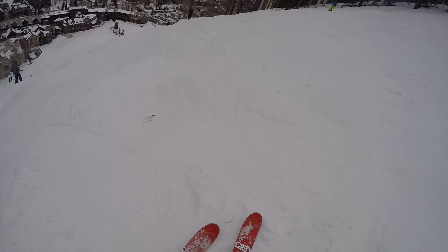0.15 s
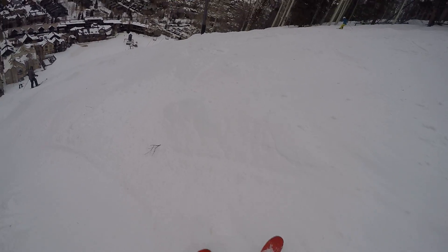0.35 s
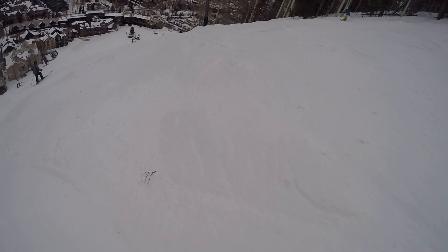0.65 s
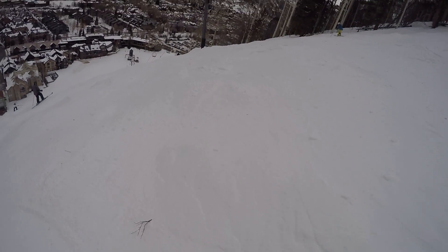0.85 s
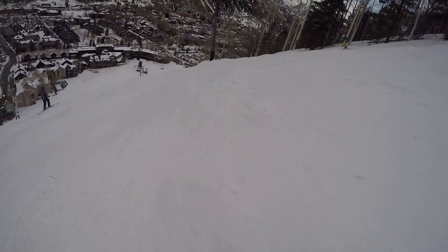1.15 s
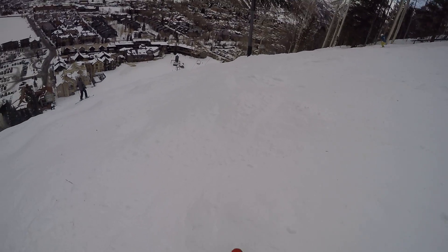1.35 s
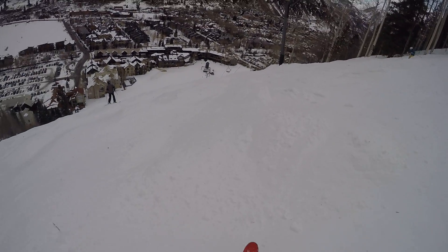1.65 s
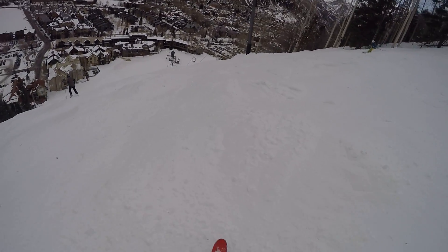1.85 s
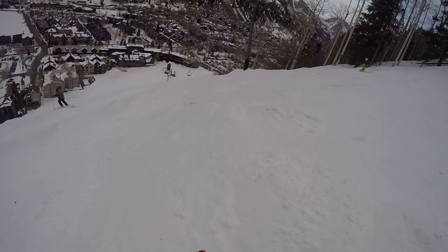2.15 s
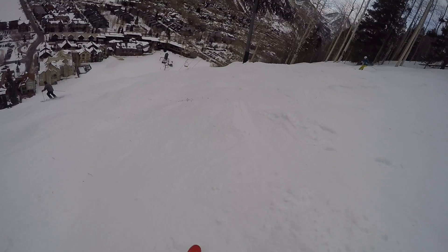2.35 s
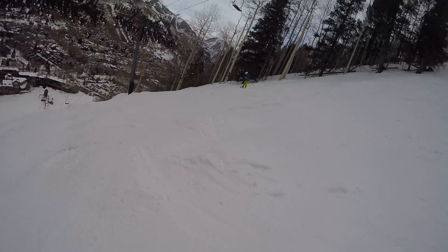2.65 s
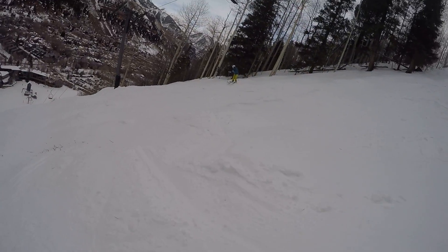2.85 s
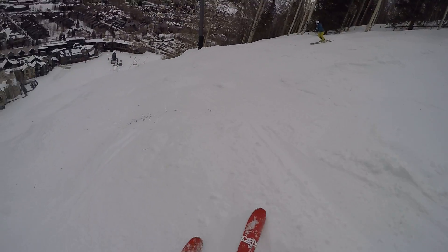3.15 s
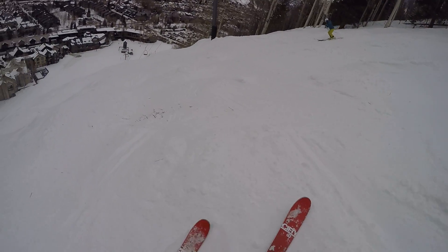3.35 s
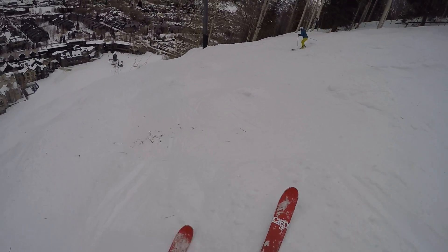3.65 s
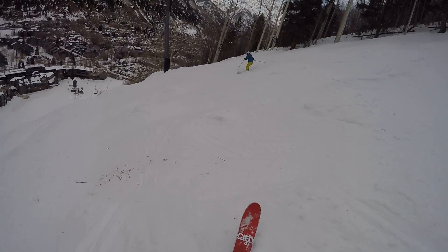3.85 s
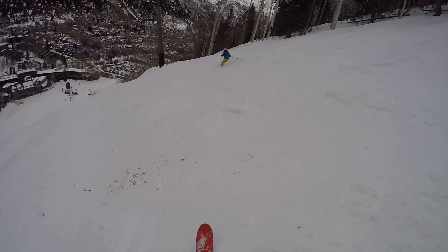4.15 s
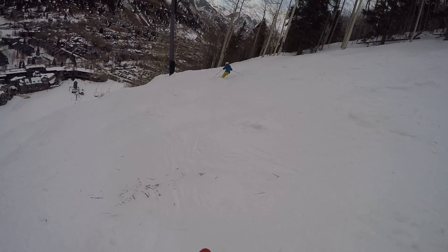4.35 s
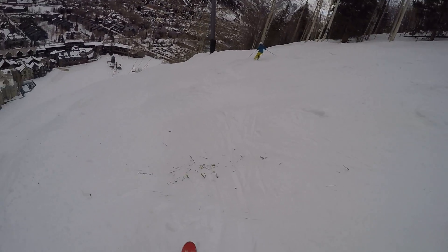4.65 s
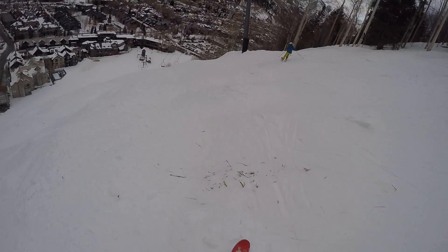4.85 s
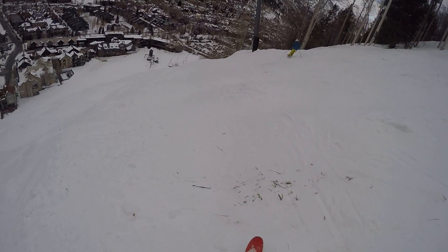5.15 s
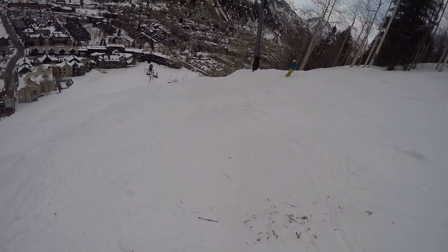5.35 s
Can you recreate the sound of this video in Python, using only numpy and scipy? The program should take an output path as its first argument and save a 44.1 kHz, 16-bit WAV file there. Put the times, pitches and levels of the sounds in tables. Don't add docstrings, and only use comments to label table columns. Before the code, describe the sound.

On an open packed slope, a body-worn camera in a closed housing catches deep, fluttering wind rumble over a fainter, grainy scrape of skis. The edge hiss swells and thins with the turns. A bump knocks early, wind bursts hardest around three seconds, and the sharpest knock comes just after four.

```python
import sys
import numpy as np
from scipy import signal
from scipy.fft import rfft, irfft, next_fast_len
from scipy.io import wavfile
from scipy.ndimage import uniform_filter1d, map_coordinates

SR = 44100
rng = np.random.default_rng(int(sys.argv[2]) if len(sys.argv) > 2 else 0)


def digitize_waveform(pressure):
    field = np.atleast_2d(pressure).T
    bounded = np.clip(field, -1, 1)
    quanta = np.round(bounded * 32767).astype(np.int16)
    wavfile.write(sys.argv[1], SR, quanta)


def voltage_ratio(level):
    return 10 ** (np.asarray(level, float) / 20)


N = 242550

# peak time in seconds, peak level in dB, build-up in seconds, beat in Hz.
GUSTS = [(0.129, -23.5, 0.061, 30.34), (0.246, -19, 0.086, 29.52), (.40, -24, 0.072, 32.45),
         (.484, -24.5, 0.056, 31.7), (0.586, -30, 0.098, 36.8), (1.073, -30.5, 0.11, 43.06),
         (1.331, -24, 0.0942, 33.8), (1.506, -23.5, 0.13, 38.1), (1.62, -29, 0.047, 41.1),
         (1.83, -22.5, 0.18, 41.12), (1.93, -23, 0.058, 33.7), (2.014, -24, 0.083, 35),
         (2.127, -22, 0.054, 37.06), (2.236, -25, 0.066, 41.87), (2.369, -23, 0.052, 35),
         (2.674, -16, 0.099, 37.99), (2.794, -22.5, 0.12, 36.96), (2.978, -12.5, 0.049, 36.95),
         (3.057, -9, 0.044, 35), (3.241, -15, 0.088, 36.35), (3.41, -25.5, .1, 41.2),
         (3.87, -25.5, 0.062, 38.48), (4.01, -24, 0.16, 39.18), (4.17, -22, 0.16, 32.75),
         (4.276, -16, 0.064, 33), (4.402, -22, 0.14, 36.33), (4.729, -20, 0.0685, 33.74),
         (4.85, -24.5, 0.062, 32.05), (5.034, -21, 0.086, 33.4), (5.39, -28, 0.086, 33.2)]
# time in seconds, level in dB.
STREAM = [(0, -31.5), (.3, -38), (.75, -37.5), (.95, -34.5), (2.2, -35), (2.43, -39), (2.6, -29),
          (3.45, -29), (3.66, -24.5), (3.8, -34.5), (4.58, -27), (4.95, -32), (5.13, -26.5), (5.28, -37),
          (5.5, -32.5)]
BEAT_UNREST = (-28, -12), (.85, .3)
# time in seconds, strength in dB, share of small eddies in dB.
EDDIES = [(0.0, -38, -0.5), (0.5, -52, 0), (.75, -52, 4.5), (0.96, -44, 1.5), (1.33, -44.5, 1.5),
          (1.54, -47, -3), (1.65, -38, -4.5), (1.78, -35.5, -0.5), (2.2, -47, 1), (2.55, -44.5, -1.5),
          (2.65, -36, -2), (2.76, -42.5, 1), (3.02, -39.5, -1), (3.47, -45, 2.5), (3.62, -49.5, 2),
          (4.4, -44, 1.5), (4.82, -50.5, -1), (5.5, -41, 1.5)]
# frequency in Hz, density in dB per Hz.
RUMBLE_SPECTRUM = [(14, -14), (24, -2), (34, 0), (48, -3), (62, -5), (80, -14), (110, -40)]
SWIRL_SPECTRUM = [(40, -59), (60, -10.5), (80, -7), (140, -6.5), (190, -17), (260, -49.5)]
FLUTTER_SPECTRUM = [(120, -7), (180, 2.5), (250, -2.5), (350, -7.5), (420, -11.5), (600, -25), (1000, -33)]
RUSH_SPECTRUM = [(300, 0.5), (420, -23), (560, 2), (820, -2.5), (950, 1.5), (1050, -87)]
# time in seconds, edge pressure in dB, powder thrown in dB.
TURNS = [(0.0, -53.5, 1), (.33, -48.5, 1), (.48, -57, 1.5), (.9, -60.5, -1), (1.08, -58.5, 4),
         (1.3, -50.5, -0.5), (1.75, -49.5, -1.5), (2.08, -52.5, 3.5), (2.27, -60, 4), (2.565, -54.5, 0.5),
         (2.6, -50, 0.5), (3.0, -47, 0.5), (3.45, -49.5, 2.5), (3.8, -51.5, 3), (4.4, -46, -0.5),
         (5.0, -50, 1), (5.15, -51.5, 1), (5.5, -53, -1)]
# time in seconds, change in dB,
# half length in seconds, share that reaches the fine crystals [1].
BITES = [(0.036, 6, 0.011, 0.9), (0.64, 4.5, 0.028, 0), (0.86, 9, 0.077, 0.2), (1.126, 8, 0.0067, 0),
         (1.43, 3, 0.045, 0.9), (1.59, -8.5, 0.068, 0.2), (1.254, 0, 0.024, 0.2), (1.936, -4.5, 0.032, 1.3),
         (2.048, 2, 0.019, 0.5), (2.342, 5, 0.035, 0.33), (2.769, 2, 0.031, 0), (2.87, 3, 0.035, 1),
         (3.02, 3, 0.079, 0.59), (3.13, -2, 0.053, 1), (3.297, -4, 0.084, 1), (3.462, 3.5, 0.048, 1),
         (3.607, 4.5, 0.011, 0.7), (3.758, -5.5, 0.026, 0.08), (3.891, 5, 0.027, 0.71),
         (4.004, 4, 0.018, 1.1), (4.244, -3, 0.039, 1.28), (4.402, 5, 0.039, 0.99), (4.563, -2.5, 0.15, .6),
         (4.993, 3, 0.048, 1.3), (5.101, -1.5, .03, 0.38), (5.222, 0.5, .03, 0.7), (5.365, -5, .04, 0),
         (5.47, -1, 0.029, 0.01)]
# frequency in Hz, density in dB per Hz.
SNOW_SPECTRUM = [(500, -62), (800, -12), (980, -20), (1100, -4), (2000, 1.5), (4300, -10), (5100, -20),
                 (7000, -24.5), (9500, -25.5), (12500, -34), (15300, -40)]
# centre in Hz, width in Hz, rise in dB.
HOUSING = [(1056, 140, 3.5), (1836, 84, 6), (2560, 240, 2), (2930, 200, 3), (3930, 520, 8.5),
           (4710, 140, 3), (5160, 170, -5.5), (5940, 1060, 14.5), (7600, 220, 3), (10200, 290, 2),
           (14000, 1500, 6.5)]
# peak time in seconds, level in dB, ring in Hz, width in Hz,
# length in seconds.
SNAPS = [(.026, -41.5, 1140, 89, 0.028), (.027, -43, 2400, 150, .008), (0.032, -38.5, 2430, 109, 0.0062),
         (0.026, -45.5, 5870, 400, 0.016), (1.148, -46.5, 1230, 120, 0.0054),
         (2.581, -43.5, 1820, 401, 0.018), (2.582, -43, 3850, 400, 0.011), (2.835, -42, 2420, 500, 0.023),
         (3.01, -41.5, 1244, 298.5, .008), (3.4, -46, 2590, 120, 0.17), (3.877, -47, 3916, 300, 0.062),
         (4.003, -42.5, 3900, 300, 0.022)]
# peak time in seconds, level in dB, ring in Hz, width in Hz,
# length in seconds.
SHAVINGS = [(0.423, -56, 815, 101, 0.016), (0.833, -58.5, 806, 150, 0.12), (1.392, -56.5, 4750, 120, .06),
            (1.406, -50, 4050, 201, 0.073), (1.77, -51, 1790, 150, 0.09), (1.782, -66, 7600, 250, .11),
            (1.8, -50.5, 3770, 198.7, .09), (2.707, -52, 2930, 150, .035), (2.873, -62, 10500, 400, 0.056),
            (3.192, -45, 3020, 246.7, 0.032), (3.446, -49, 4077, 250, 0.029),
            (3.93, -64, 10150, 401, 0.037), (4.388, -57, 10400, 3000, .03), (4.405, -44, 3030, 900, .03),
            (4.498, -54.5, 810, 150, 0.036), (5.463, -55.5, 710, 199.9, 0.046)]
# time in seconds, peak level in dB, pitch in Hz.
PUFFS = [(0.074, -25, 157), (0.097, -26, 123), (0.212, -34, 243), (0.234, -29, 150), (0.513, -41, 208),
         (.67, -38, 197), (.85, -29, 110), (0.873, -38, 205), (1.122, -40, 118), (1.312, -29.5, 105),
         (1.736, -42, 336), (1.772, -43, 119), (1.8, -36, 288), (2.35, -34.5, 223), (2.367, -21.5, 128),
         (2.612, -17, 83), (2.646, -20, 96), (2.68, -24, 80.8), (2.71, -34, 182), (2.756, -35.5, 242),
         (2.8, -29, 109.2), (3.208, -38, 163), (3.329, -31, 131.6), (3.442, -28.5, 116.6), (3.47, -33, 137),
         (3.579, -39, 119), (3.902, -33.5, 136), (5.019, -46, 222), (5.433, -39.5, 381.3),
         (5.482, -39.5, 394)]
# time in seconds, peak level in dB, tilt to upper modes in dB per octave.
KNOCKS = [
    (0.1726, -15, -7.5),
    (0.389, -35, -9.5),
    (1.587, -43, 1),
    (2.609, -21, -10),
    (3.019, -39, 1),
    (4.085, -12.5, -2),
    (5.229, -33.5, -29),
]
# frequency in Hz, level in dB, 60 dB decay time in seconds.
MOUNT = [(150, 5, 0.025), (329.6, 0.5, 0.046), (570, -10.5, 0.053), (873, -15.5, 0.027), (1034, -23, .03)]
# start in seconds, length in seconds, peak level in dB,
# first pitch in Hz, last pitch in Hz.
HUMS = [
    (0.524, .16, -38.5, 159.4, 125.5),
    (1.654, 0.095, -41.5, 135, 206.5),
    (1.806, .11, -37.5, 245, 127.5),
    (2.314, .045, -28, 113.1, 135.2),
]

MEAN_PRESSURE_DB = -51


def unit(x):
    return x / np.sqrt(np.mean(x ** 2) + 1e-20)


def along(points, hz):
    f, v = np.transpose(points)
    return np.interp(np.log(hz + 1), np.log(f + 1), v)


def curves(rows):
    s, *cols = np.transpose(rows)
    return [np.interp(np.arange(N) / SR, s, c) for c in cols]


def wobble(rate):
    knots = rng.standard_normal(int(N * 60 / SR))
    return map_coordinates(knots, [np.arange(N) * rate / SR])


def coloured(x, gain_db):
    m = next_fast_len(N + SR // 4)
    gain = voltage_ratio(gain_db(np.fft.rfftfreq(m, 1 / SR)))
    return unit(irfft(rfft(x, m) * gain, m)[:N])


def lumpy(spectrum, depth_db, rate):
    noise = rng.standard_normal(N) * voltage_ratio(depth_db * wobble(rate))
    return coloured(noise, lambda hz: along(spectrum, hz) - 100 * (hz > 2 * spectrum[-1][0]))


def tone(hz):
    return np.sqrt(2) * np.sin(2 * np.pi * np.cumsum(hz) / SR)


def gusts():
    t = np.arange(N) / SR
    drop_db, fall = 11, 0.715
    steady_hz = 35
    power = []
    for s, db, rise, _ in GUSTS:
        away = np.maximum((s - t) / rise, (t - s) / (fall * rise))
        power.append(voltage_ratio(db - drop_db * away ** 1.2) ** 2)
    power = np.array(power)
    steady = voltage_ratio(curves(STREAM)[0]) ** 2
    total = power.sum(0) + steady
    beat_hz = (np.array(GUSTS)[:, 3] @ power + steady_hz * steady) / total
    return beat_hz, 10 * np.log10(total)


def edges():
    t = np.arange(N) / SR
    pressure_db, powder_db = curves(TURNS)
    bumps = np.array([db * np.exp(-((t - s) / half) ** 2) for s, db, half, _ in BITES])
    around_db = pressure_db - MEAN_PRESSURE_DB
    coarse_db = around_db + bumps.sum(0)
    fine_db = around_db + np.array(BITES)[:, 3] @ bumps
    return coarse_db, fine_db, powder_db


def vortex(beat_hz, buffet_db):
    loose = np.interp(buffet_db, *BEAT_UNREST)
    beat = tone(beat_hz * (1 + .08 * wobble(16))) * (1 + .55 * loose * wobble(26))
    beat = unit(beat + loose * lumpy(RUMBLE_SPECTRUM, depth_db=.6, rate=9))
    power = uniform_filter1d(uniform_filter1d(beat ** 2, size=1800), size=1800)
    strength = np.sqrt(np.abs(power) + 0.18)
    return voltage_ratio(buffet_db) * unit(np.tanh(0.16 * beat / strength ** 0.65))


def wind():
    beat_hz, buffet_db = gusts()
    buffet = vortex(beat_hz, buffet_db)
    swirl_db, small_db = curves(EDDIES)

    calm_db, calm_flutter_db = -44, -52
    flutter_db = calm_flutter_db + 0.87 * (swirl_db - calm_db) + small_db
    rush_db = -65.5 + 0.25 * (flutter_db - calm_flutter_db) + 0.74 * edges()[0]
    gust_db = buffet_db - uniform_filter1d(buffet_db, size=SR // 2)
    stirred_db = swirl_db - 1.0 + 0.22 * gust_db

    swirl = voltage_ratio(stirred_db) * lumpy(SWIRL_SPECTRUM, depth_db=2.6, rate=9.5)
    flutter = voltage_ratio(flutter_db - 0.5) * lumpy(FLUTTER_SPECTRUM, depth_db=2.5, rate=32)
    rush = voltage_ratio(rush_db) * lumpy(RUSH_SPECTRUM, depth_db=2.2, rate=13)
    return buffet + swirl + flutter + rush


def crystals(spread_db, clump_db, patchy_db):
    size_db = spread_db * np.minimum(rng.exponential(size=N), 4)
    clump = uniform_filter1d(rng.standard_normal(N), size=90)
    clicks = rng.standard_normal(N) * voltage_ratio(size_db + clump_db * unit(clump))
    z = signal.stft(clicks, nperseg=256)[2]
    field = uniform_filter1d(rng.standard_normal(z.shape), size=4, axis=0)
    field = uniform_filter1d(field, size=20, axis=1)
    return signal.istft(z * voltage_ratio(patchy_db * unit(field)), nperseg=256)[1][:N]


def snow_colour(hz):
    rises = sum(db / (1 + (2 * (hz - centre) / width) ** 2) for centre, width, db in HOUSING)
    return along(SNOW_SPECTRUM, hz) + rises


def skis():
    coarse_db, fine_db, powder_db = edges()
    scrape_db = MEAN_PRESSURE_DB + coarse_db
    hiss_db = -53.5 + fine_db + powder_db
    spray_db = -65.5 + 0.91 * fine_db + 1.9 * powder_db
    push = voltage_ratio(0.69 * wobble(6) + 0.55 * wobble(35))
    snow = crystals(spread_db=2.5, clump_db=0.9, patchy_db=1.5)

    def over(hz, edge_hz):
        return 1 / (1 + (edge_hz / (hz + 1)) ** 12)

    def part(share):
        return coloured(snow, lambda hz: snow_colour(hz) + 20 * np.log10(share(hz) + 1e-6))

    scrape = voltage_ratio(scrape_db) * part(lambda hz: 1 - over(hz, 2913))
    hiss = voltage_ratio(hiss_db) * part(lambda hz: over(hz, 2970) - over(hz, 6780))
    spray = voltage_ratio(spray_db) * part(lambda hz: over(hz, 6450))
    return push * (scrape + hiss + spray)


def crusts():
    out, t = np.zeros(N), np.arange(N) / SR
    rows = [(*row, 0.021) for row in SNAPS] + [(*row, 1) for row in SHAVINGS]
    for s, db, ring_hz, width_hz, life, rise in rows:
        noise = rng.standard_normal(N)
        ring = coloured(noise, lambda hz: -20 * np.log10(1 + ((hz - ring_hz) / width_hz) ** 2))
        swell = np.exp(-np.maximum((s - t) / (rise * life), (t - s) / life))
        out += voltage_ratio(db) * swell * ring
    return out


def puffs():
    out, t = np.zeros(N), np.arange(N) / SR
    for s, db, hz in PUFFS:
        length = 0.0075 / (hz / 100) ** 0.36
        phase = rng.uniform(0, 2 * np.pi)
        swing = np.cos(2 * np.pi * hz * (t - s) + phase)
        out += voltage_ratio(db) * np.exp(-((t - s) / length) ** 2) * swing
    return out


def knocks():
    out, t = np.zeros(N + SR), np.arange(-SR // 100, SR // 8) / SR
    lowest_hz = MOUNT[0][0]
    for s, db, sharp_db in KNOCKS:
        begin = round(s * SR) - SR // 100
        for k, (hz, level, t60) in enumerate(MOUNT):
            u, rise = (t, .0035) if k < 2 else (t + 0.00409, .0008)
            gain = voltage_ratio(db - 4 + level + sharp_db * np.log2(hz / lowest_hz))
            fade = np.where(u < 0, np.exp(-(u / rise) ** 4), voltage_ratio(-60 * u / t60))
            out[begin:][:len(t)] += gain * fade * np.cos(2 * np.pi * hz * u)
    return out[:N]


def hums():
    out, t = np.zeros(N), np.arange(N) / SR
    for s, length, db, first_hz, last_hz in HUMS:
        u = np.clip((t - s) / length, 0, 1)
        hz = last_hz + (first_hz - last_hz) * np.exp(-2.35 * u)
        edge_db = 8 * (2 * u - 1) ** 4
        level = np.abs(np.sin(np.pi * u)) ** .5 * voltage_ratio(db - edge_db)
        unrest = wobble(40)
        stumble = 1 + .28 * np.roll(unrest, SR)
        out += level * stumble * tone(hz * (1 + .025 * unrest))
    return out


def scene():
    hiss_points = [(3000, -2), (9000, -5.5), (15000, -15)]  # Hz, dB
    own = voltage_ratio(-66.5) * coloured(rng.standard_normal(N), lambda hz: along(hiss_points, hz))
    return (wind() + skis() + crusts_at_own_strength() + puffs() + knocks() + hums() + own)[None]


def crusts_at_own_strength():
    return crusts()


def band_limit(x):
    return signal.sosfilt(signal.butter(12, 15340, fs=SR, output="sos"), x)


def record(dry):
    kept = irfft(rfft(dry) * (np.fft.rfftfreq(N, 1 / SR) < 15200), N)
    return band_limit(kept)


dry = scene()
out = record(dry)
digitize_waveform(out)
```